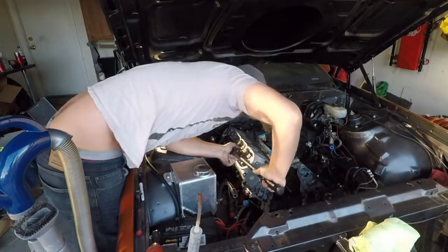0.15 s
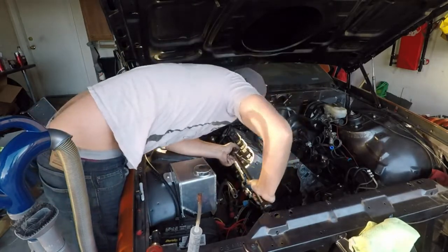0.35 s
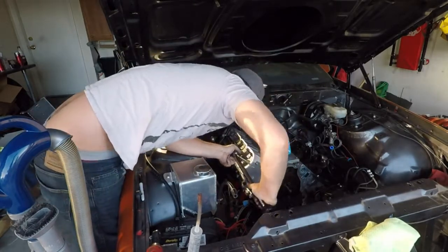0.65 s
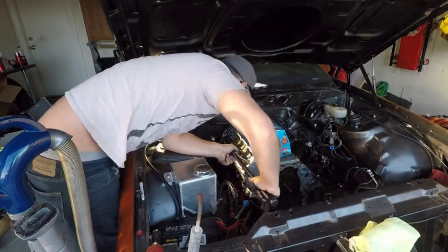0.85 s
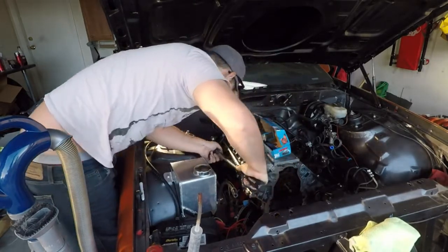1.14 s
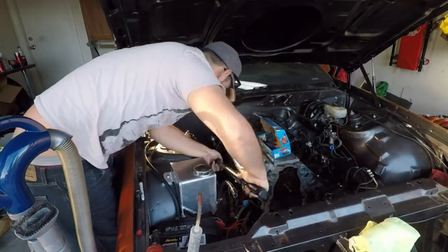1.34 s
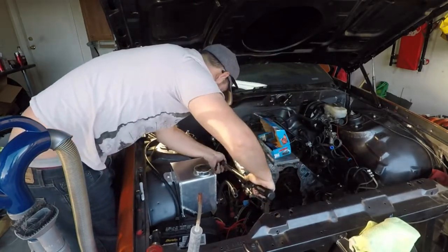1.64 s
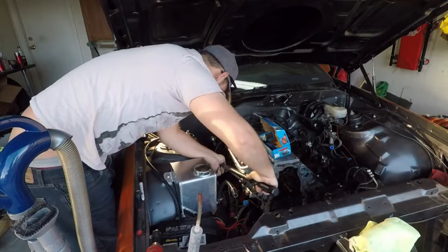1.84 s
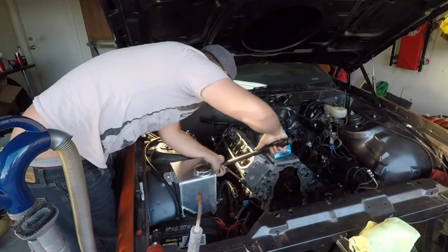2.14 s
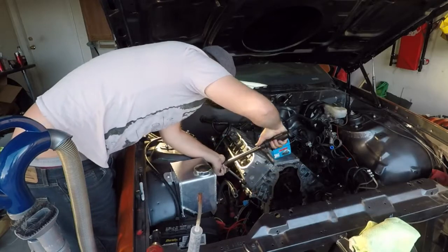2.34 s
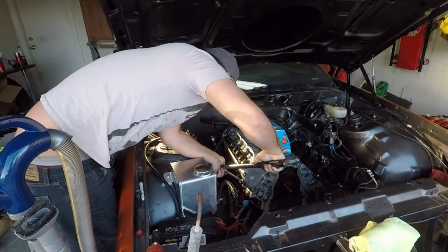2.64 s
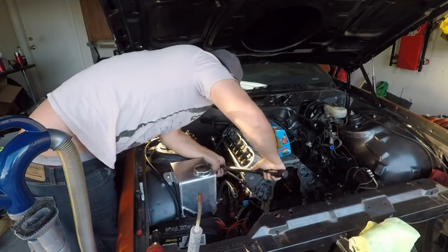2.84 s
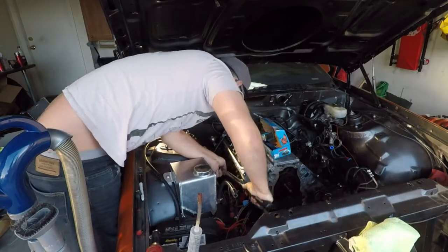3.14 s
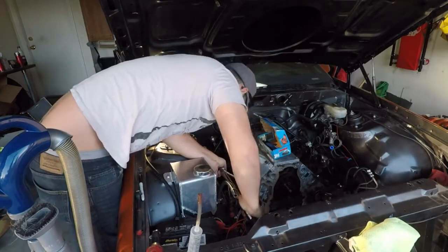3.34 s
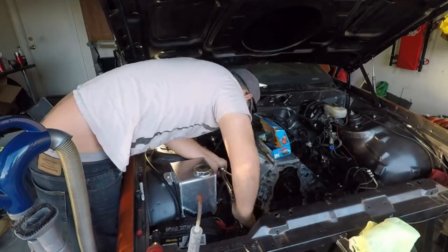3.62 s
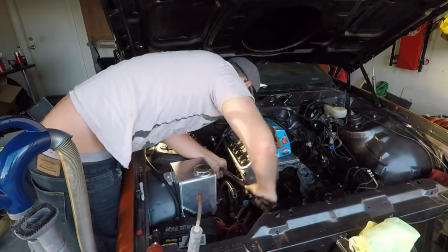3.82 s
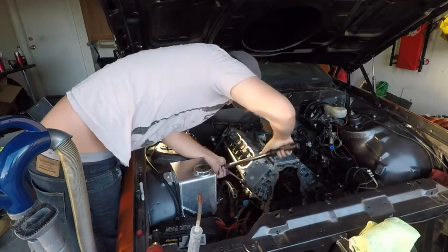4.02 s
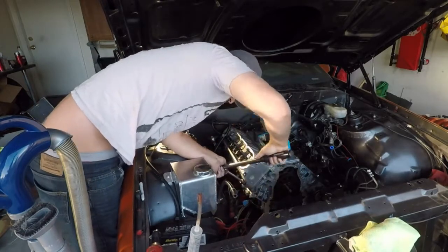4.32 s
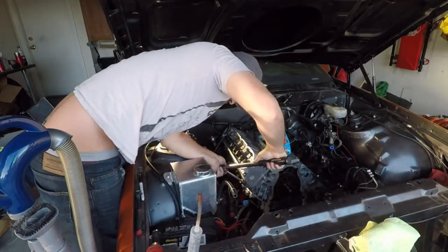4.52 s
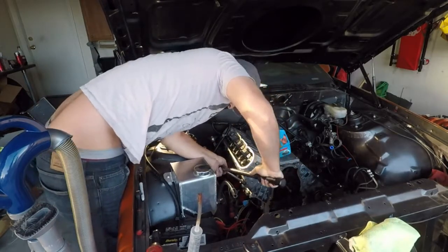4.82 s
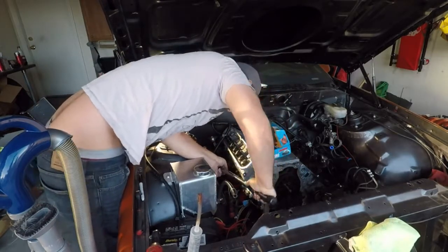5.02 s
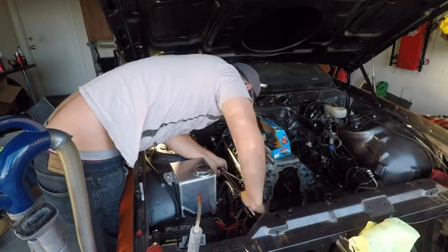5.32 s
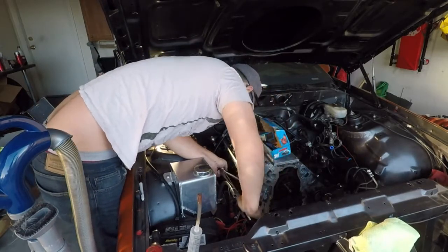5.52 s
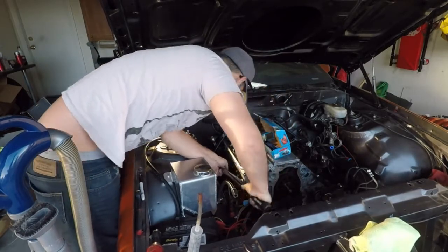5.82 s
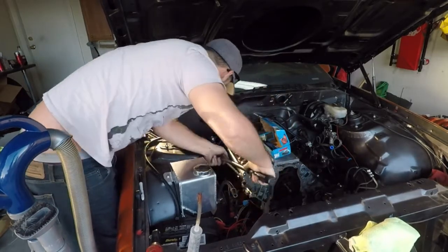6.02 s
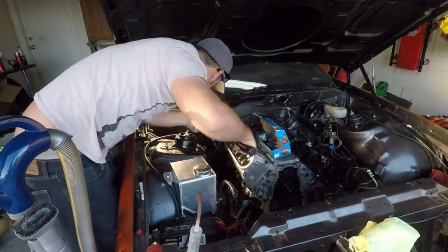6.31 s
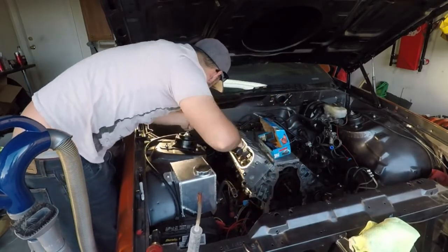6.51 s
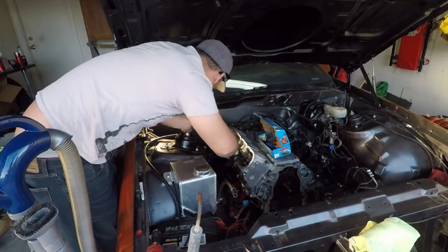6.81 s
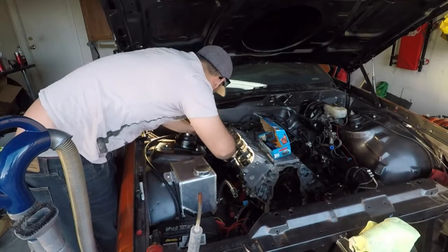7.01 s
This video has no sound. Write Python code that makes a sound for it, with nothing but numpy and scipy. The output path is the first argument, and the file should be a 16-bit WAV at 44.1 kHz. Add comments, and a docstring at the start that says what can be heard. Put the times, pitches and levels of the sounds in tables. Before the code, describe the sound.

A torque wrench works on bolts in a car's engine bay, in an open garage with a soft outdoor wash and a very faint distant machinery hum. At about 0.4 and 0.6 seconds it gives two loud, sharp metallic clicks with a brief steel ring. The socket knocks more softly in a small cluster around 1 second, then singly four times between 1.5 and 2.1 seconds. A lull follows, with a few tiny taps and a barely audible squeak near 3.5 seconds. From 3.8 to 4.1 seconds the ratchet ticks six times in quick succession. A second pair of loud clicks lands at 5.4 and 5.6 seconds, followed by a lighter knock at 5.9. Each click has a short echo and a faint room tail. A low draught rumbles on the microphone throughout, gusting harder from 5.6 seconds until the end, just after 7 seconds.

```python
"""An open garage, where a click-type torque wrench tightens two bolts in an engine bay.
Its hinge snaps over at the set torque and snaps back as the pull eases, ringing the steel tube;
the socket knocks on the bolts and the pawl ticks over its teeth, each with a short engine-bay echo
and a faint garage tail. A draught rises in gusts on the microphone, over an outdoor wash,
a distant machinery hum, a thin high hiss and one soft squeak."""
import sys
import numpy as np
from scipy import signal
from scipy.fft import rfft, irfft
from scipy.io import wavfile

SR = 44100
rng = np.random.default_rng(int(sys.argv[2]) if len(sys.argv) > 2 else 0)


def persist_wave(psi):
    """Save psi, clipped to +-1, as 16-bit WAV."""
    counts = np.round(np.clip(psi, -1, 1) * 32767).astype(np.int16)
    wavfile.write(sys.argv[1], SR, np.atleast_2d(counts).T)


N = 315756

# Tone of the outdoor wash: freq_hz, density_db
AIR_SPECTRUM = [(60, -14.5), (110, -7.5), (200, -7), (320, -9), (450, -8.5), (720, -9.5), (1100, -14.5),
                (1840, -25.5), (3000, -31), (4400, -34), (5600, -37), (7100, -40.5), (15000, -43.5)]
# Hum lines of distant machinery: pitch_hz, early_level_db, late_level_db
HUM_LINES = [(142.3, -68.5, -60), (178.5, -67.5, -63), (176, -67.5, -72.5), (256, -63, -73),
             (430, -67, -80.5), (738, -68, -69)]
# Passes of the hiss: start_s, end_s, level_db
HISS_PASSES = [(1.604, 2.69, -69.5), (6.119, 6.381, -70.5), (6.532, 6.65, -68)]
# Its narrow, high band: freq_hz, density_db
HISS_SPECTRUM = [(3000, -30), (4500, -9), (5400, -4), (5950, -4), (6300, -22), (6570, -12), (7000, -20),
                 (15000, -32)]
# Arc of the squeak: time_s, pitch_hz, level_db
SQUEAK_CURVE = [(3.27, 507, -82), (3.47, 526, -68), (3.69, 520, -67), (3.84, 500, -75)]
# Its overtones: harmonic_number, gain_db
SQUEAK_HARMONICS = [(4, -4), (5, 0), (6, -10)]

# Strength of the draught: time_s, pressure_db, flutter_db
DRAUGHT_CURVE = [(0.0, -38, -41.5), (0.26, -48, -57), (0.68, -35, -42), (1.32, -41.5, -47.5),
                 (1.44, -37, -40.5), (1.74, -45, -56), (2.28, -38.5, -52.5), (2.681, -61, -64),
                 (3.58, -31.5, -49.5), (4.44, -42, -52.5), (4.66, -30, -43.5), (5.16, -43, -58),
                 (5.2, -30.5, -46.5), (5.54, -30.5, -45.5), (5.64, -21.5, -23), (6.54, -24.5, -43.5),
                 (6.68, -19, -29), (7.14, -22, -29.5)]
# Gusts that break into fine turbulence: peak_s, strength_db, half_width_s
GUST_PEAKS = [(5.61, -40, 0.026), (5.702, -46, 0.044), (5.793, -50, .05), (6.1, -51.5, 0.091),
              (6.283, -47, 0.064), (6.663, -43, .06), (6.75, -49, 0.072), (6.878, -41.5, 0.069),
              (6.973, -39.5, 0.042), (7.11, -33, 0.069)]
# The four wind layers, from slowest eddies to finest: freq_hz, density_db
HEAVE_SPECTRUM = [(2, -11.5), (5, 0.5), (10, 2), (16, -6), (26, -22.5), (60, -60.5), (800, -130)]
PRESSURE_SPECTRUM = [(8, -16.5), (17, 1.5), (26, 3.5), (44, -6), (60, -15), (90, -30), (160, -57),
                     (2000, -120)]
FLUTTER_SPECTRUM = [(30, -21), (55, 11.5), (75, 6.5), (110, -4), (170, -15), (300, -30), (600, -47),
                    (4000, -100)]
TURBULENCE_SPECTRUM = [(70, -15.5), (140, 1.5), (260, -11), (480, -20.5), (1200, -42.5), (4000, -49.5),
                       (12000, -62.5)]

# Tone of the garage's late ring: freq_hz, density_db
GARAGE_SPECTRUM = [(200, -17.5), (900, -1.5), (1400, -1.5), (2250, -2), (3000, -1), (3700, 0.5), (4500, -2),
                   (5600, 0.5), (7000, -17.5), (9500, -15.5), (10800, -9.5), (12000, -15.5), (15000, -19.5)]
# Echo decay under the bonnet: freq_hz, t60_s
BAY_DECAY = [(200, 0.29), (1400, 0.53), (3800, 0.34), (6000, .34), (8000, 0.28), (10000, 0.24),
             (10800, 0.33), (11600, 0.13), (15000, .27)]

# Socket and wrench knocking on bolts and engine:
# start_s, level_db, bass_db, treble_db, t60_s, hollow_hz, ping_hz, ping_db, rebound_delay_s
SOCKET_KNOCKS = [(0.9428, -42, -11.5, 7, 0.12, 820, 5660, -15, 0),
                 (0.9517, -30.5, -13, 2.5, 0.099, 845, 5560, -7, 0.00027),
                 (0.9607, -39, 14, 8, 0.12, 825, 3550, -3, 0.00022),
                 (1.0187, -34, -1.5, 2, 0.062, 830, 4700, -3.5, 0.0051),
                 (1.5144, -31.5, -6, -5.5, 0.071, 930, 4890, -5, 0.017),
                 (1.6343, -29, -18, 8, 0.084, 906, 5340, -6.5, 0.012),
                 (1.8645, -29.5, 3.5, 6.5, 0.076, 932, 5200, 1.5, 0.0036),
                 (2.1422, -24, 3, -4, .045, 912, 3490, -3.5, 0.0094),
                 (2.49, -58, 15, -1, .11, 907, 2715, -1, 0.00074),
                 (3.035, -63, -10, -4, .05, 920, 3500, -8, 0),
                 (3.4407, -53, -1, 8, 0.12, 930, 5230, -7, 0.0016),
                 (3.4762, -50, 10.5, -9, 0.4, 922, 5000, -9, 0.025),
                 (4.3058, -58, 11, -4, 0.082, 920, 3390, -5, 0),
                 (5.8262, -44, -8, -7, .045, 910, 1795, 2, 0),
                 (5.9175, -28, -8, 1.5, 0.11, 911, 3460, -22, 0.021),
                 (5.9757, -41.5, 5, -12, 0.18, 915, 5460, -15, 0),
                 (6.2872, -53, -2, -8, 0.061, 920, 3000, -9, 0),
                 (6.7028, -49, -14, -10, 0.11, 920, 3690, -6, 0.0014)]
# The socket's clack: freq_hz, density_db
SOCKET_SPECTRUM = [(200, -19), (550, -16), (920, -17.5), (1150, -2.5), (1600, -6), (2300, -0.5),
                   (2900, -4.5), (3550, -2.5), (4200, -6.5), (5200, -3), (6500, -10), (8500, -17),
                   (12500, -18), (15000, -26)]
# The pawl dropping over the teeth: start_s, level_db, treble_db, ping_hz, ping_db
PAWL_TICKS = [(3.8476, -29.5, -6, 5730, -24), (3.89, -32, -1, 4590, -3), (3.9295, -29.5, -1.5, 5370, -1),
              (3.9712, -32, 1.5, 5480, 0), (4.0162, -33.5, -1, 4850, -2), (4.0671, -33, 1.5, 6000, -17)]
# The pawl's tick, and the ring it leaves in the head: freq_hz, density_db
PAWL_SPECTRUM = [(800, -15), (2000, -9.5), (2800, -4), (3500, -5.5), (5500, 1.5), (6400, -0.5), (7400, -13),
                 (9500, -5.5), (10600, -0.5), (11100, -8), (11600, 0), (12500, -7), (15000, -4.5)]
HEAD_RING_SPECTRUM = [(1500, -16), (2300, 1.5), (2800, -12), (3500, -2), (4200, -13), (5200, -3),
                      (6200, -14), (7500, -18), (15000, -16)]
# Snaps of the hinge: start_s, level_db, is_back (0 snaps over, 1 snaps back), treble_db
HINGE_SNAPS = [(0.4063, -8.5, 0, 0), (0.619, -11, 1, -2.5), (5.3614, -10.5, 0, 2.5),
               (5.5895, -11.5, 1, -0.5)]
# Modes of the steel tube and head: pitch_hz, snap_over_db, snap_back_db, t60_s
WRENCH_MODES = [(915, -19, -14, .15), (1147, -15, -14, .14), (1429, -12, -21, .16), (2124, -14, -9, .11),
                (2336, -15, -10, .11), (2549, -14, -8, .11), (2980, -11, -9, .11), (3310, -5, -8, .11),
                (3545, 3, -10, .12), (3819, -6, -5, .14), (4955, -7, -4, .1), (5173, -4, -5, .11),
                (5383, -4, -9, .11), (5717, -1, -9, .12), (8336, -13, -22, .08), (10595, -10, -10, .11),
                (10717, -11, -11, .15), (10925, -9, -10, .13), (12621, -14, -9, .07)]
# The dense crack in each direction: freq_hz, density_db
SNAP_OVER_SPECTRUM = [(100, -7.5), (300, -14.5), (560, -29), (950, -14.5), (1450, -1.5), (1950, -10),
                      (3600, -0.5), (4400, -1.5), (5700, -3), (7700, -10.5), (9400, -10.5), (10800, -3),
                      (11600, -12.5), (15000, -13)]
SNAP_BACK_SPECTRUM = [(100, -13.5), (300, -13.5), (600, -26), (950, -4), (1500, -11), (2300, -2.5),
                      (3700, 0), (4300, -6.5), (5200, 2), (6100, -3.5), (7900, -13), (10900, -2.5),
                      (12700, -4), (15000, -16.5)]


def amp(db):
    """Decibels to gain."""
    return 10 ** (np.asarray(db) / 20)


def unit_rms(x):
    """Scales to rms 1."""
    return x / np.sqrt(np.mean(x ** 2) + 1e-20)


def curve_at(points, hz):
    """Reads a curve on a log-frequency axis."""
    freq_hz, value = np.transpose(points)
    return np.interp(np.log(hz + 1), np.log(freq_hz + 1), value)


def add(mix, start_s, sound):
    """Drops a sound into the mix."""
    part = mix[round(start_s * SR):][:len(sound)]
    part += sound[:len(part)]


def noise(spectrum, bass_db=0, treble_db=0, size=N):
    """Noise coloured by a spectrum at rms near 1, then shelved in the bass and treble."""
    hz = np.fft.rfftfreq(size, 1 / SR)
    colour = unit_rms(amp(curve_at(spectrum, hz)))
    shelves = amp(curve_at([(1000, bass_db), (2600, 0), (5000, 0.014), (9500, treble_db)], hz))
    return irfft(rfft(rng.standard_normal(size)) * colour * shelves, size)


def drift(rate_hz):
    """A random wobble of rms 1, rolled off above rate_hz."""
    hz = np.fft.rfftfreq(N, 1 / SR)
    return unit_rms(irfft(rfft(rng.standard_normal(N)) / (1 + (hz / rate_hz) ** 4), N))


def decay(t, t60, rise_s=0.000049):
    """A struck envelope: quick attack, then 60 dB down in t60 seconds."""
    return (1 - np.exp(-t / rise_s)) * amp(-60 * t / t60)


def ping(t, hz, t60):
    """One struck mode at a random phase, starting at rms near 1."""
    return np.sqrt(2) * decay(t, t60) * np.sin(2 * np.pi * (hz * t + rng.random(np.shape(hz))))


def cluster(t, hz, t60, width_hz, count=5):
    """Close modes of loosely joined parts, beating against each other."""
    modes_hz = hz + width_hz * np.linspace(-.5, .5, count)[:, None]
    return ping(t, modes_hz, t60).sum(0) / np.sqrt(count)


def outdoor_air(level_db=-52.5, waver_db=0.48):
    """A soft, nearly steady wash from outside."""
    return amp(level_db + waver_db * drift(7.0)) * noise(AIR_SPECTRUM)


def machinery_hum(waver_hz=1.5, swell_db=2):
    """Distant machinery: wavering hum lines whose balance shifts midway."""
    crossfade = np.interp(np.arange(N) / SR, [3.2, 3.9], [0, 1])
    hum = np.zeros(N)
    for hz, early_db, late_db in HUM_LINES:
        level_db = early_db + (late_db - early_db) * crossfade + swell_db * drift(0.38)
        cycles = np.cumsum(hz + waver_hz * drift(9.1)) / SR
        hum += amp(level_db) * np.sqrt(2) * np.sin(2 * np.pi * cycles)
    return hum


def hiss(fade_s=0.048, flicker_db=3):
    """A thin, high hiss that flickers as it comes and goes."""
    t = np.arange(N) / SR
    level = sum(amp(db) * np.clip(np.minimum(t - start_s, end_s - t) / fade_s, 0, 1)
                for start_s, end_s, db in HISS_PASSES)
    return level * amp(-flicker_db * drift(30)) * noise(HISS_SPECTRUM)


def squeak(jitter_hz=5, flicker_db=5):
    """A faint squeak whose pitch arches and sags; only its upper partials carry."""
    t = np.arange(N) / SR
    time_s, pitch_hz, level_db = np.transpose(SQUEAK_CURVE)
    cycles = np.cumsum(np.interp(t, time_s, pitch_hz) + jitter_hz * drift(62)) / SR
    tone = sum(amp(gain_db + flicker_db * drift(16)) * np.sin(2 * np.pi * harmonic * cycles)
               for harmonic, gain_db in SQUEAK_HARMONICS)
    return np.interp(t, time_s, amp(level_db), left=0, right=0) * tone


def eddies(spectrum, window_samples=6001):
    """Low turbulence, levelled so that its strength holds steady."""
    rumble = noise(spectrum)
    window = signal.windows.hann(window_samples)
    power = signal.fftconvolve(rumble ** 2, window / window.sum(), "same")
    return rumble / np.sqrt(power + 1e-4)


def wind(heave_trim_db=-1.23, heave_slope=0.69, flutter_trim_db=-1, gust_flutter_db=4,
         lumpy_db=2.5, patchy_db=2):
    """Slow eddies heave and push on the microphone; gusts flutter and break into finer eddies."""
    t = np.arange(N) / SR
    time_s, *curves = np.transpose(DRAUGHT_CURVE)
    pressure_db, flutter_db = (np.interp(t, time_s, curve) for curve in curves)
    gust = sum(amp(db) * np.exp(-((t - peak_s) / half_width_s) ** 2)
               for peak_s, db, half_width_s in GUST_PEAKS)
    heave = amp(heave_trim_db + heave_slope * pressure_db) * eddies(HEAVE_SPECTRUM, 20001)
    push = amp(pressure_db) * eddies(PRESSURE_SPECTRUM)
    flutter_level = np.hypot(amp(flutter_db + flutter_trim_db), amp(gust_flutter_db) * gust)
    flutter = flutter_level * eddies(FLUTTER_SPECTRUM)
    turbulence = gust * noise(TURBULENCE_SPECTRUM) * amp(patchy_db * drift(23))
    buffeting = (push + flutter) * amp(lumpy_db * drift(5))
    return (heave + buffeting + turbulence) * signal.windows.tukey(N, .008)


def garage_reverb(clicks, wet_db=-36, t60=2.7):
    """The garage stores the energy of each click and lets it go as a faint diffuse ring."""
    release = decay(np.arange(2 * SR) / SR, t60, rise_s=0.022) ** 2
    power = np.abs(signal.fftconvolve(clicks ** 2, release / release.sum())[:N])
    return clicks + amp(wet_db) * np.sqrt(power) * noise(GARAGE_SPECTRUM)


def bay_echo(t, spectrum, bass_db=0, treble_db=0, build_s=0.0043):
    """A click's dense echo between bonnet and engine: each band dies at its own speed."""
    hz, time_s, bands = signal.stft(noise(spectrum, bass_db, treble_db, len(t)), SR, nperseg=256)
    fade = amp(-60 * time_s / curve_at(BAY_DECAY, hz)[:, None])
    tail = signal.istft(bands * fade, SR, nperseg=256)[1][:len(t)]
    return tail * (1 - np.exp(-t / build_s))


def knock(level_db, bass_db, treble_db, t60, hollow_hz, ping_hz, ping_db, hollow_db=-15, echo_db=-21):
    """Loose steel meets steel, damped by the hand; each point of contact favours its own ping."""
    t = np.arange(16384) / SR
    clack = decay(t, t60, rise_s=0.0011) * noise(SOCKET_SPECTRUM, bass_db, treble_db, len(t))
    ring = amp(ping_db) * cluster(t, ping_hz, t60=0.071, width_hz=160)
    hollow = amp(hollow_db + bass_db) * cluster(t, hollow_hz, t60=0.2, width_hz=130)
    echo = amp(echo_db) * bay_echo(t, SOCKET_SPECTRUM, bass_db, treble_db)
    return amp(level_db) * (clack + ring + hollow + echo)


def socket_knocks(min_rebound_s=.004):
    """The socket knocks on its way from bolt to bolt; some hits rebound softer, fuller and duller."""
    out = np.zeros(N)
    for start_s, db, bass_db, treble_db, t60, hollow_hz, ping_hz, ping_db, rebound_s in SOCKET_KNOCKS:
        add(out, start_s, knock(db, bass_db, treble_db, t60, hollow_hz, ping_hz, ping_db))
        if rebound_s > min_rebound_s:
            rebound = knock(db - 7.5, bass_db + 8, treble_db - 35, t60=0.12,
                            hollow_hz=hollow_hz, ping_hz=2590, ping_db=-7.5)
            add(out, start_s + rebound_s, rebound)
    return out


def ratchet(rattle_db=-13, head_db=-12, linger_db=-30, echo_db=-21):
    """On the back swing the pawl ticks into one tooth after another and rings the head."""
    out, t = np.zeros(N), np.arange(32768) / SR
    envelope = decay(t, t60=0.036, rise_s=0.00051) + amp(rattle_db) * decay(t, t60=0.096)
    linger_envelope = amp(linger_db) * decay(t, t60=1.36, rise_s=0.011)
    for start_s, level_db, treble_db, ping_hz, ping_db in PAWL_TICKS:
        tick = envelope * noise(PAWL_SPECTRUM, treble_db=treble_db, size=len(t))
        ring = amp(ping_db) * ping(t, ping_hz, t60=0.032)
        head = amp(head_db) * cluster(t, hz=10600, t60=0.046, width_hz=180)
        linger = linger_envelope * noise(HEAD_RING_SPECTRUM, size=len(t))
        echo = amp(echo_db) * bay_echo(t, PAWL_SPECTRUM, treble_db=treble_db)
        add(out, start_s, amp(level_db) * (tick + ring + head + linger + echo))
    return out


def wrench_snaps(crack_db=3, rattle_db=-5, ring_db=-5.5, echo_db=-16.5):
    """The hinge slams against the tube: a crack, a short dense rattle and ringing steel."""
    out, t = np.zeros(N), np.arange(16384) / SR
    mode_hz, over_db, back_db, mode_t60 = np.transpose(WRENCH_MODES)[:, :, None]
    envelope = amp(crack_db) * decay(t, t60=.036, rise_s=0.00036) + amp(rattle_db) * decay(t, t60=0.14)
    for start_s, level_db, is_back, treble_db in HINGE_SNAPS:
        spectrum = SNAP_BACK_SPECTRUM if is_back else SNAP_OVER_SPECTRUM
        mode_gains = amp(back_db if is_back else over_db)
        crack = envelope * noise(spectrum, treble_db=treble_db, size=len(t))
        ring = (mode_gains * ping(t, mode_hz, mode_t60)).sum(0) / np.linalg.norm(mode_gains)
        echo = amp(echo_db) * bay_echo(t, spectrum, treble_db=treble_db)
        add(out, start_s, amp(level_db) * (crack + amp(ring_db) * ring + echo))
    return out


def scene():
    """Mono mix: the tool in the garage's reverb, over the draught and the background bed."""
    tool = garage_reverb(wrench_snaps() + ratchet() + socket_knocks())
    return (tool + hiss() + squeak() + wind() + machinery_hum() + outdoor_air())[None]


def record(dry, cutoff_hz=15400):
    """Soft-clips the loudest peaks, then cuts the very top."""
    rounded = dry / (1 + np.abs(dry) ** 6) ** (1 / 6)
    padded = np.pad(rounded, ((0, 0), (127, 127)), mode="edge")
    lowpass = signal.firwin(255, cutoff_hz, window=("kaiser", 9), fs=SR)
    return signal.oaconvolve(padded, lowpass[None], "valid")


dry = scene()
out = record(dry)
persist_wave(out)
```